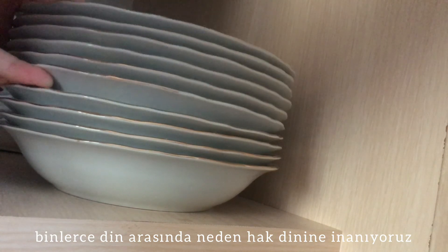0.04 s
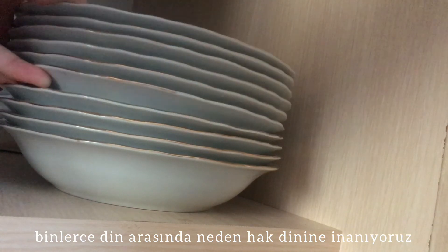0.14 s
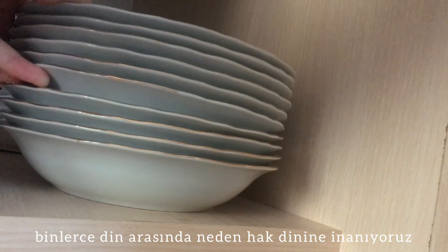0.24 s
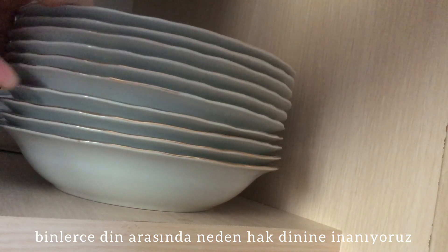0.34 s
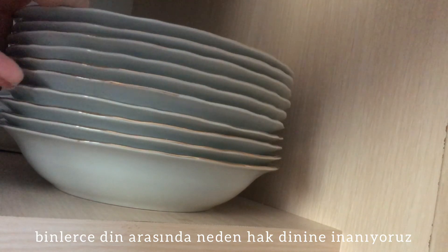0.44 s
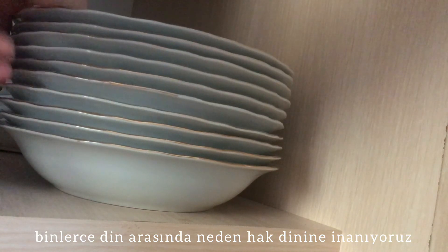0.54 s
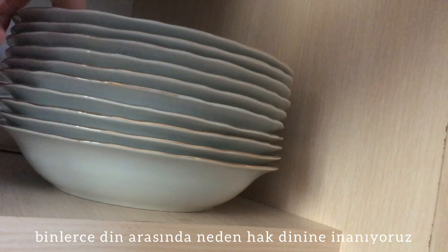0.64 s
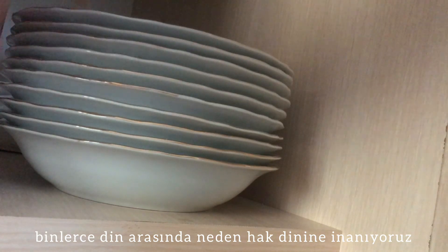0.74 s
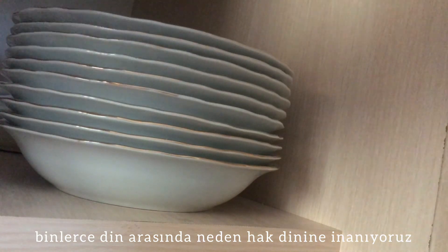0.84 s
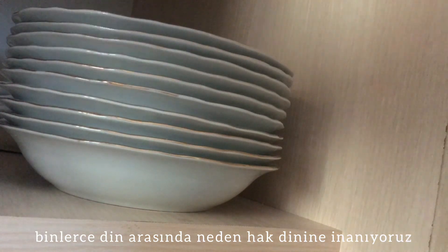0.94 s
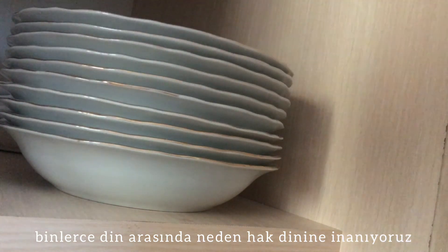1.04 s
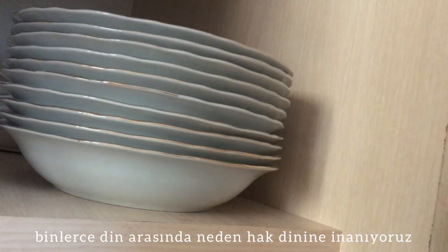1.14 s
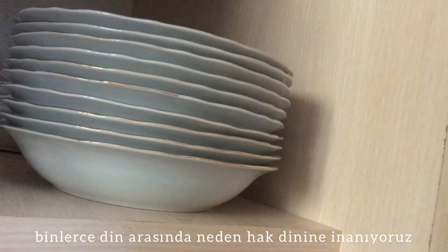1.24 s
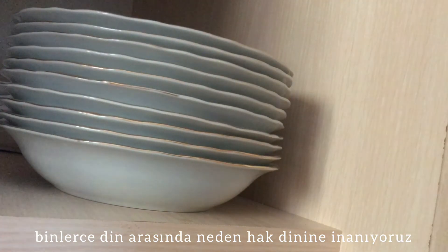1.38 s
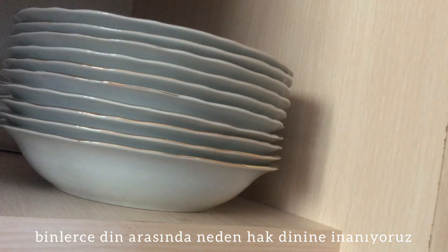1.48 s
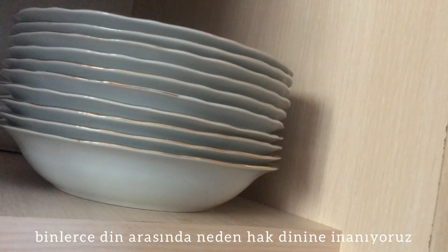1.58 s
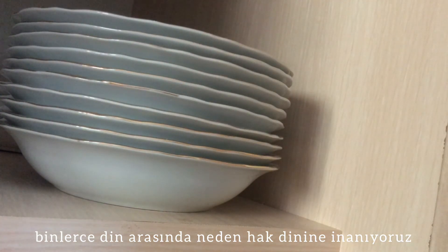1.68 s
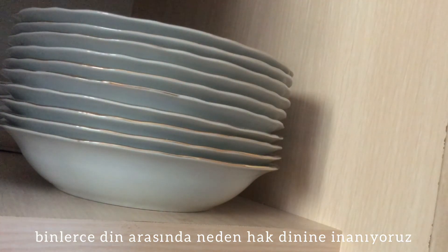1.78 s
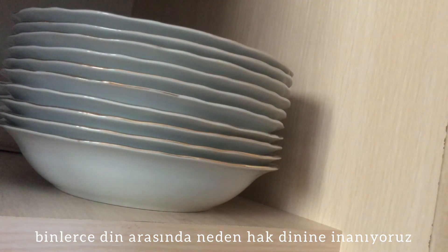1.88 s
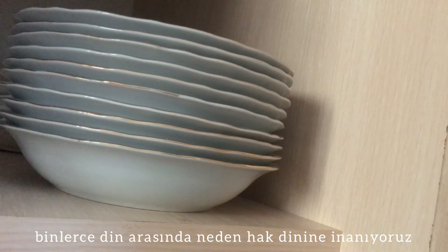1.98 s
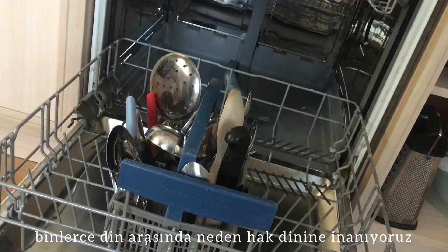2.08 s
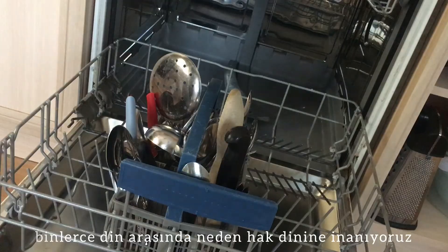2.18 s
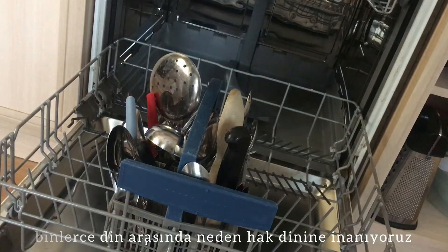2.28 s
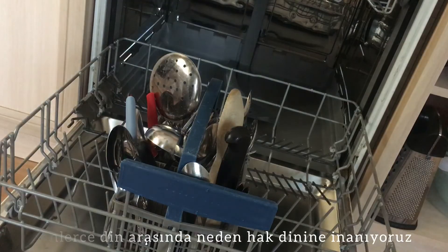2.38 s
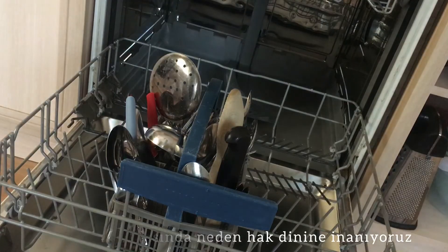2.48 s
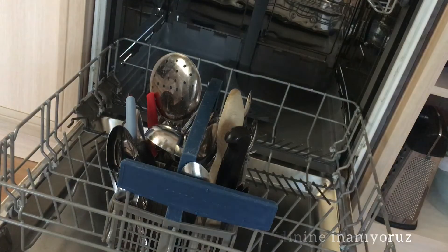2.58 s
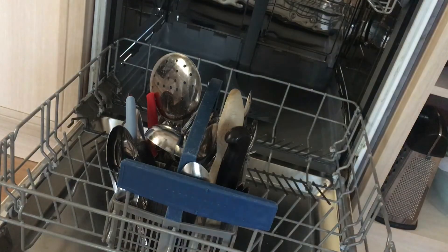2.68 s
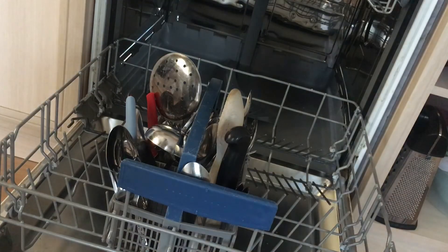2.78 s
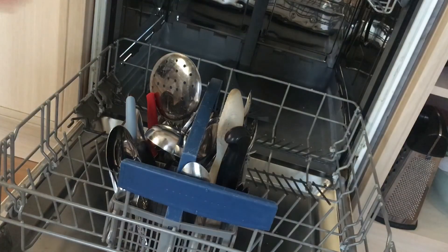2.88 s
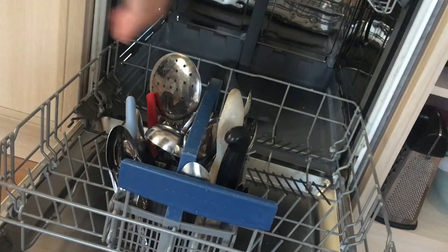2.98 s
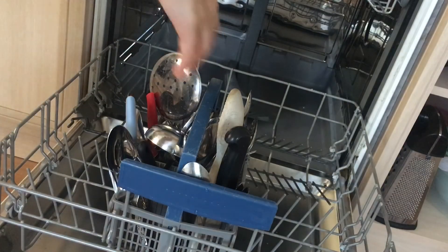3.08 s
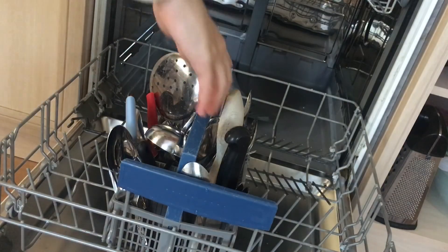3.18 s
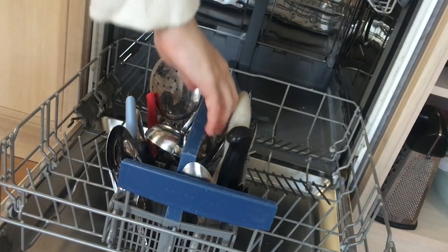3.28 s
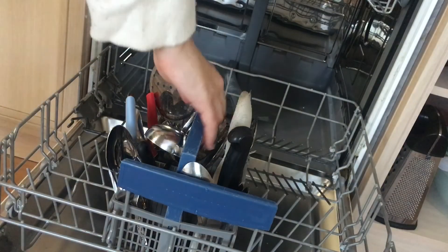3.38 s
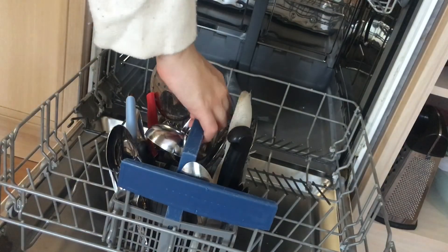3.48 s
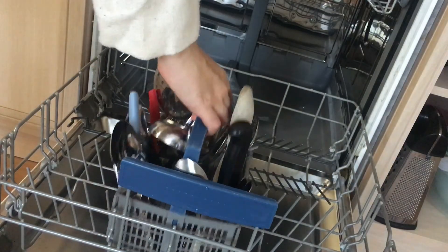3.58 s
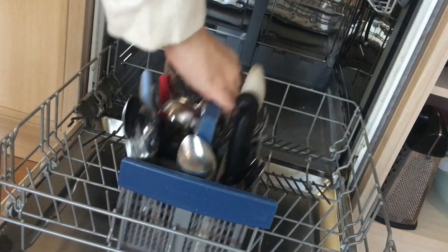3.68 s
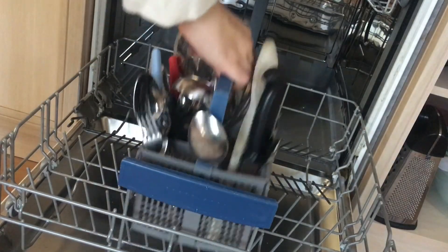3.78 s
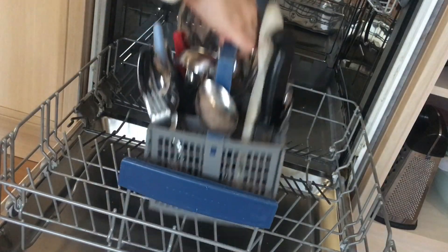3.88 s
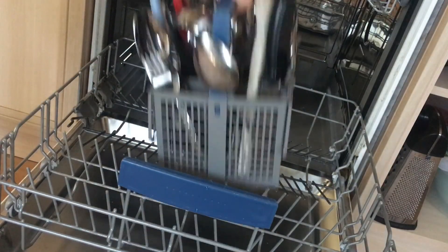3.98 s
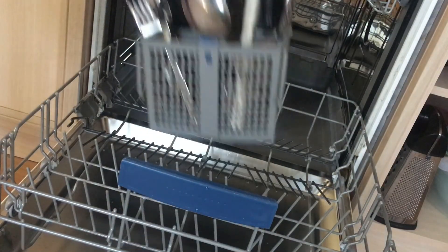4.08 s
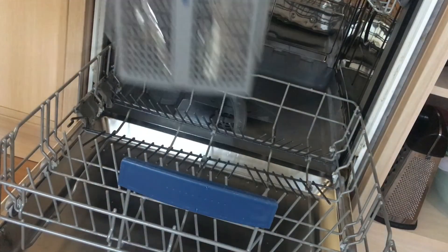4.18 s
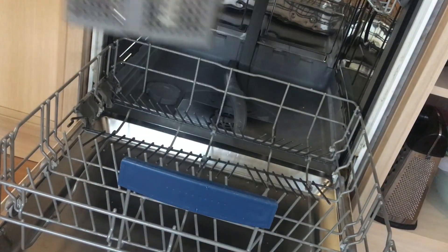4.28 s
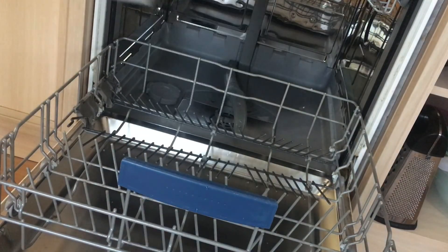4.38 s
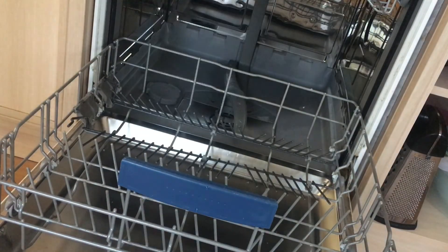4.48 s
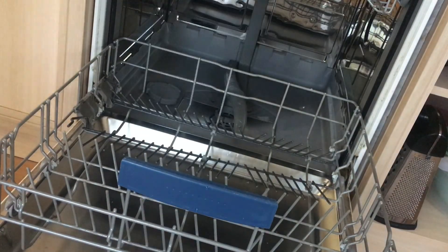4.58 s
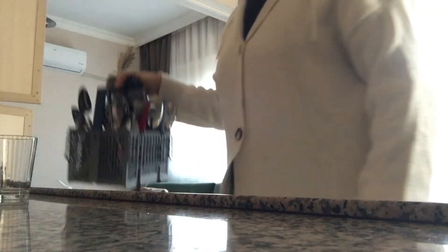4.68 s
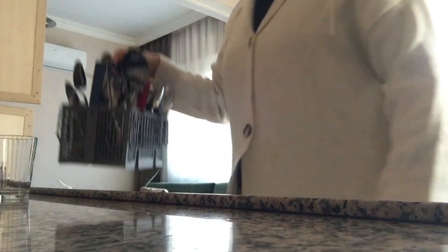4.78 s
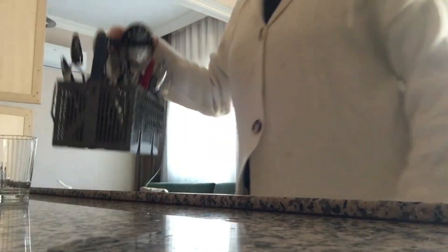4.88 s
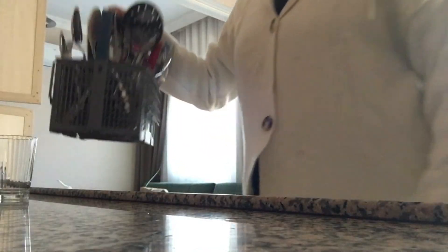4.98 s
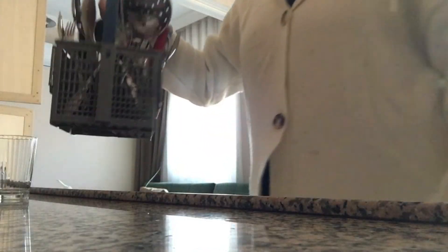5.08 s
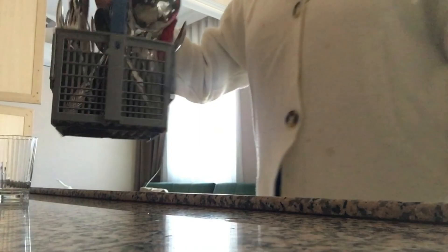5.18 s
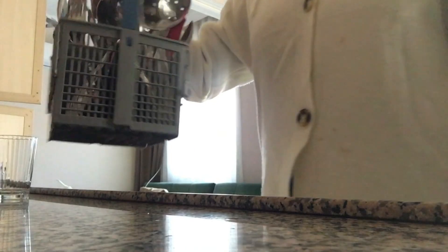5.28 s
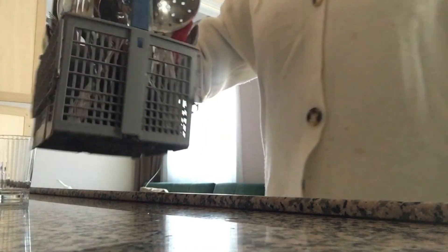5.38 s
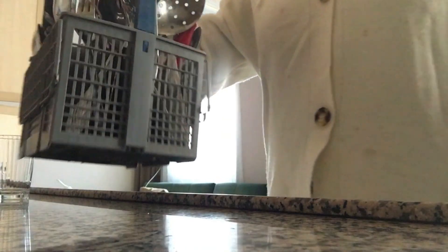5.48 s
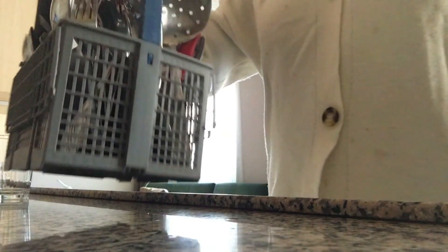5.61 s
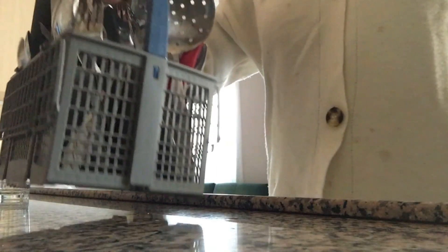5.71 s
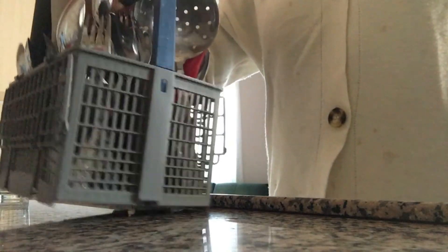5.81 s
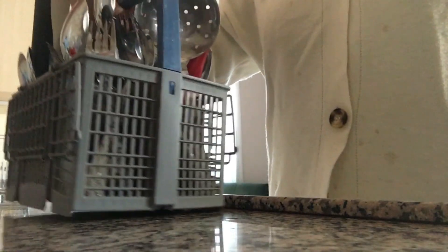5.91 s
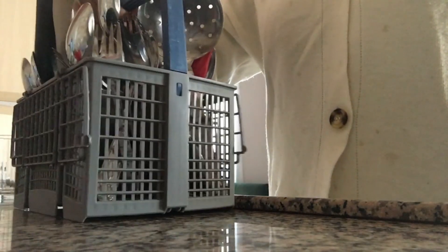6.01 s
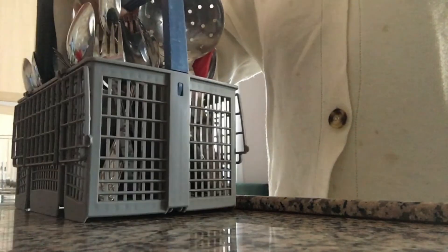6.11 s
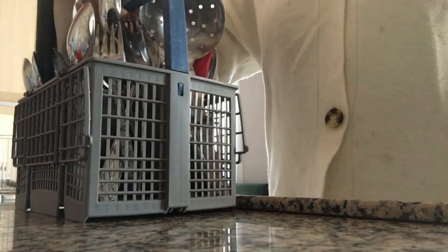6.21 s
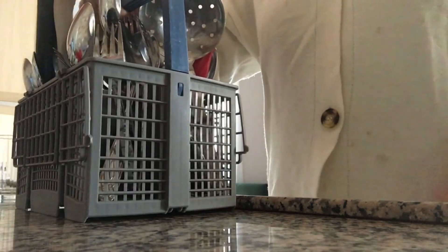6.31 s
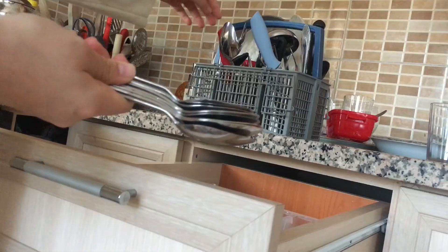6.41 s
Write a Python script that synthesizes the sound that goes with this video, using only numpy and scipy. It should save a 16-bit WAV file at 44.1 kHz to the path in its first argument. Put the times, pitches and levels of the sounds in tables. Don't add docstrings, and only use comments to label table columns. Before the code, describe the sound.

Heavy plates knock together twice within half a second, bright and hard over a boxy wooden thump, then only low appliance hum. Cloth brushes softly, fingers grip plastic, and spoons and forks clink in an irregular rattle as the basket lifts. One small late clink, a cut to quiet room tone, then basket and cutlery bump down on stone, close to the phone microphone.

```python
import sys
import numpy as np
from scipy import signal
from scipy.fft import rfft, irfft
from scipy.io import wavfile
from scipy.ndimage import uniform_filter1d

SR = 44100
rng = np.random.default_rng(int(sys.argv[2]) if len(sys.argv) > 2 else 0)


def rack_gain(trim_db):
    fader = np.asarray(trim_db, float)
    return 10 ** (fader / 20)


def to_wav(s):
    ch = np.atleast_2d(s).T
    pcm = np.round(np.clip(ch, -1, 1) * 32767)
    wavfile.write(sys.argv[1], SR, pcm.astype(np.int16))


N = 284445

CUTS = [0, .518, 2.066, 4.613, 6.386, 7]
# mode_hz, level_db, t60_s
CUTLERY = [(4600, -17, 0.14), (5787, -1, 0.11), (6800, 23, 0.1), (6960, 8, 0.17), (8050, -16, 0.13),
           (8800, 17, 0.087), (9970, -3, 0.13), (10780, -9, .15), (11150, -6, .12), (11986, 11, .15),
           (12750, 2, .08), (13700, -10, .1), (14300, -4, .12), (15230, -6, .13)]


def shape(hz, table):
    f, v = np.transpose(table)
    return np.interp(np.log(np.maximum(hz, 1)), np.log(f), v)


def colour(x, table):
    hz = np.arange(len(x) // 2 + 1) * SR / len(x)
    y = irfft(rfft(x) * rack_gain(shape(hz, table)), len(x))
    return y / np.std(y)


def split(x):
    low_hz, high_hz = 1500, 6000
    low = signal.sosfilt(signal.butter(4, low_hz, fs=SR, output="sos"), x)
    mid = signal.sosfilt(signal.butter(4, [low_hz, high_hz], "band", fs=SR, output="sos"), x)
    high = signal.sosfilt(signal.butter(4, high_hz, "high", fs=SR, output="sos"), x)
    return low, mid, high


def crest(x):
    return np.sqrt(uniform_filter1d(x ** 2, size=256).max())


def decay(t, t60):
    return 1000. ** (-t / t60)


def walk(rate, count=N):
    hold = max(int(SR / rate), 1)
    levels = np.repeat(rng.standard_normal(count // hold + 1), hold)
    return 1.2 * uniform_filter1d(levels, hold)[:count]


def add(out, s, x):
    i = max(int(s * SR), 0)
    out[i:i + len(x)] += x[:len(out) - i]


def swells(rows):
    t, out = np.arange(N) / SR, 0
    for s, db, rise, fall in rows:
        cut = CUTS[np.searchsorted(CUTS, s)]
        lapse = np.where(t < s, (s - t) / max(rise, .004), (t - s) / max(fall, .004))
        out = out + (t < cut) * rack_gain(db - 20 * lapse)
    return out


def room_tone(place, count):
    # band_hz, level_db_per_hz
    air = [
        [(25, -12), (80, -4), (124, -18.5), (275, -10.5), (377, -24.5), (742, -24), (1500, -33), (16400, -48)],
        [(25, -27), (70, -4.5), (111, -15), (150, -6.5), (200, -7), (432, -21.5), (1180, -32.5), (16400, -50)],
        [(30, -34), (65, -13.5), (170, -17.5), (450, -27.5), (684, -24), (1970, -42), (5240, -50), (16400, -57)],
        [(35, -41.5), (60, -3.5), (349, -3), (2620, -20.5), (13900, -30), (16400, -30)],
    ]
    air_db = [-57.5, -56.5, -59, -66.5]
    hum_db = [-66.5, -57.5, -50, -93]
    # band_hz, level_db, width_hz
    drone = [
        [(68.4, -66.5, 12), (93.4, -59.5, 9.8), (198.8, -59, 22), (285, -67, 20), (345, -74.5, 1.8),
         (567, -72.5, 16)],
        [(78, -78, 7.6), (198.4, -59, 7.23), (284, -68.5, 9.6), (700, -78.5, 27)],
        [(62, -65, 5.85), (78, -60.5, 13.9), (104, -59.5, 11), (212, -69.5, 9.2), (392, -74, 25),
         (694, -71.5, 25), (1210, -77.5, 25)],
        [],
    ]
    hum_hz = 146.8
    turn = 2j * np.pi * np.arange(count) / SR
    noise = colour(rng.standard_normal(N), air[place])[:count]
    out = rack_gain(air_db[place] + .4 * walk(4, count=count)) * noise
    hum_level = rack_gain(hum_db[place] + 0.55 * walk(4.1, count=count))
    out += np.sqrt(2) * hum_level * np.exp(hum_hz * turn).real
    for hz, db, width in drone[place]:
        rate = max(width, 8)
        sway = walk(rate, count=count) + 1j * walk(rate, count=count)
        out += rack_gain(db) * (sway * np.exp(hz * turn)).real
    return out


def room_tail():
    # band_hz, t60_s
    room_t60 = [(100, 0.93), (1000, 0.55), (4000, 0.23), (9000, .28), (11000, 0.12), (16000, 0.062)]
    f, t, z = signal.stft(rng.standard_normal(SR), SR, nperseg=256)
    tail = signal.istft(z * decay(t, shape(f, room_t60)[:, None]), SR, nperseg=256)[1]
    tail = tail * (1 - np.exp(-np.arange(len(tail)) / SR / 0.017))
    return tail / np.sqrt(np.sum(tail ** 2))


def board_thuds():
    # start_s, level_db, pitch_hz
    boards = [(0.002, -27, 93), (0.04, -31, 101), (0.302, -26, 103.2), (0.37, -27.5, 99.8),
              (0.449, -56.5, 103), (0.499, -37.5, 79.1), (0.534, -48.5, 109), (3.611, -39, 190),
              (3.758, -42, 166), (3.821, -43, 66.6), (3.948, -58, 193), (5.809, -32.5, 212),
              (5.859, -40, 132), (5.95, -33.5, 95), (5.983, -29.5, 216.2), (6.05, -34.5, 150),
              (6.09, -38.5, 62)]
    out, t = np.zeros(N), np.arange(SR // 2) / SR
    for s, db, hz in boards:
        fade = (1 - np.exp(-t / 0.01)) * decay(t, 0.24)
        dull = colour(rng.standard_normal(len(t)), [(30, -30), (hz, 0), (400, -10), (900, -40)])
        pair = np.sin(2 * np.pi * hz * t) + 0.14 * np.sin(2 * np.pi * 1.2 * hz * t)
        add(out, s, rack_gain(db) * fade * (pair + 0.51 * dull))
    return out


def rubs():
    # band_hz, level_db_per_hz
    friction = [(180, -43), (300, 7.5), (496, -16.5), (670, 6.5), (2020, -11), (3510, -9), (8660, -24),
                (16400, -33)]
    # peak_s, level_db, rise_s per 20 dB, fall_s
    # per 20 dB
    slides = [
        (.05, -51, -0.13, 0.2),
        (.41, -52, -1.5, -0.5),
        (.535, -57, 0.2, 0.33),
        (4.2, -63.5, 0.05, 0.5),
    ]
    sleeve = [
        (2.14, -44.5, 0.067, 0.13),
        (2.344, -51.5, 0.058, 0.044),
        (2.85, -58, 0.44, 0.61),
        (3.125, -46.5, 0.05, 0.14),
        (4.305, -59, .02, .03),
    ]
    grip = [
        (3.2, -57.5, 0.082, 0.15),
        (3.45, -47, 0.11, .12),
        (3.53, -46, .04, 0.26),
        (3.70, -54, 0.021, 0.31),
        (3.81, -45.5, 0.11, 0.08),
        (4.5, -57, 0.028, 0.21),
        (6.345, -56, 0.15, 0.096),
    ]
    shaking = [
        (3.79, -42.5, 0.48, 0.078),
        (4.02, -50.5, 0.43, 0.079),
        (4.53, -84, 0.073, .22),
    ]
    grain = colour(rng.standard_normal(N), friction) * rack_gain(1.5 * walk(400) + walk(40))
    low, mid, high = (part / np.std(part) for part in split(grain))
    out = 0
    for rows, low_db, high_db in ((slides, 9.5, -27.5), (sleeve, -15, -5), (grip, -0.5, 3)):
        out = out + swells(rows) * rack_gain(-15.0) * (mid + rack_gain(low_db) * low + rack_gain(high_db) * high)
    rumble = colour(rng.standard_normal(N), [(100, -11), (170, 2.0), (250, 4.5), (400, -64.0), (800, -98)])
    return out + swells(shaking) * rack_gain(1.8 * walk(25)) * rumble


def shiver():
    # peak_s, level_db, rise_s per 20 dB, fall_s per 20 dB
    jingle = [(3.367, -52, .004, .015), (3.585, -57, .01, .04), (3.725, -56, .02, .04),
              (3.76, -54, .02, .04), (3.785, -56, .02, .02), (4.443, -50, .004, .04),
              (5.815, -48, .005, .04), (5.975, -62, .02, .02)]
    # band_hz, level_db_per_hz
    grain_colour = [(5000, -30), (8000, 2), (11000, 7), (15500, 7), (16400, -10)]
    # peak_s, level_db, rise_s per 20 dB, fall_s per 20 dB
    whine = [(5.45, -85, .3, .4), (5.68, -87, .2, .2)]
    whine_hz = 5150
    grains = colour(rng.standard_normal(N) * rack_gain(3.5 * walk(900)), grain_colour)
    squeak = np.sin(2 * np.pi * whine_hz * np.arange(N) / SR + 1.5 * walk(40))
    return swells(jingle) * rack_gain(-7) * grains + swells(whine) * squeak


def pings():
    # start_s, level_db, mode_hz, t60_s
    touches = [(.302, -15, 5400, 0.053), (0.337, -36, 2950, .06), (.493, -50, 3860, .03),
               (.493, -52, 6500, 0.026), (.312, -18, 850, 0.024), (.0205, -21, 4070, 0.022),
               (3.528, -23.5, 1940, 0.014), (3.6, -51, 2000, .1), (5.988, -25, 2065, 0.022),
               (3.19, -65, 4400, 0.23), (3.215, -62, 9500, 0.21), (3.2, -64, 2040, 0.16),
               (3.27, -65, 2560, .04), (3.3655, -56, 8500, 0.017), (3.3655, -57, 11600, 0.011),
               (3.397, -44, 4600, .04), (3.404, -50, 1630, 0.038), (3.423, -62, 3300, .04),
               (3.441, -46, 4200, .04), (3.466, -55, 11900, .04), (3.513, -58, 8300, .05),
               (3.579, -51, 4360, .04), (3.581, -54, 8800, 0.054), (3.6217, -45, 9500, 0.027),
               (3.628, -68, 12500, .08), (3.651, -67.5, 15500, 0.14), (3.656, -49, 5700, .04),
               (3.683, -40.5, 2030, .04), (3.683, -43.5, 5700, .03), (3.7225, -51, 6800, .05),
               (3.722, -48, 4300, .04), (3.72, -60, 12550, .05), (3.739, -57, 13500, .05),
               (3.745, -58, 10970, .05), (3.7645, -52, 15200, .06), (3.766, -48, 14400, .04),
               (3.771, -57, 13200, .05), (3.803, -47, 12500, 0.049), (3.82, -50, 15300, .15),
               (4.428, -64, 8800, 0.058), (4.427, -63, 9900, 0.047), (4.428, -64.5, 6400, .04),
               (4.441, -48, 15300, .06), (4.445, -54, 8800, 0.051), (5.82, -39, 15000, 0.089),
               (5.836, -39, 6900, .06), (5.833, -39, 9800, 0.055), (5.842, -47, 4470, .04),
               (5.991, -49, 12800, .05), (6.002, -56, 15000, .04), (6.006, -49, 13840, .06),
               (6.04, -52, 3650, 0.23), (6.177, -51, 6440, 0.033), (6.31, -58, 6980, .06)]
    out, t = np.zeros(N), np.arange(SR // 8) / SR
    for s, db, hz, t60 in touches:
        wave = np.sin(2 * np.pi * hz * t + 1.2 * walk(300, count=len(t)))
        onset = 1 - np.exp(-t / 0.00039)
        add(out, s, rack_gain(db) * onset * wave * decay(t, np.clip(t60, .01, .2)))
    return out


def rings():
    # start_s, level_db, free_s until damped
    struck = [(.004, -25, .2), (.301, -14.5, 0.23), (.303, -15.5, 0.009), (.335, -19, .17),
              (0.522, -50.5, 0.17), (.636, -61.5, 0.12), (3.27, -60, 0.17), (3.396, -50, .1),
              (3.453, -50.5, .1), (3.53, -46, .065), (3.544, -35, .1), (3.623, -44, .1), (3.796, -40.5, .4),
              (3.819, -44, 0.5), (4.44, -54, 0.19), (5.817, -34, 0.3), (5.989, -37.5, 0.052),
              (6.003, -38.5, 0.27)]
    # mode_hz, level_db, t60_s
    rims = [
        [(700, -1.5, 0.17), (1072, 2, .1), (3270, -5, 0.078), (5400, -6, 0.045), (5954, -13, 0.055),
         (4200, -1, 0.097), (4300, -17.5, 0.15), (6400, -14.5, 0.082)],
        [(750, -1.5, 0.084), (1647, 1, 0.05), (1965, -10.5, 0.02), (3180, -13, 0.11), (3500, -10.5, 0.079),
         (3940, -12.5, 0.039), (4600, -12.5, 0.029), (5400, -0.5, 0.05), (6250, -12.5, 0.018),
         (8300, -9, 0.057)],
        [(635, 2.5, 0.25)],
        [(1107.5, -6, 0.085), (2950, 0, 0.05), (4255, -15.5, 0.07), (4940, -17, 0.2), (9000, -18, 0.066)],
    ]
    settling = [(1405, -2, 0.47), (1900, -2.5, 0.4), (2440, -4, 0.36), (2900, -7, 0.33), (3138, -10, .35),
                (3300, -10, 0.61), (4500, -14, 0.55), (4969, -16, .28), (5400, -23, 0.38),
                (5954, -11, 0.23), (6428, -14, .35), (6800, -14, 0.18), (8600, -22, .2)]
    resettling = [(1430, 1, 0.44), (2500, -1, .25), (3100, -8, 0.3), (4470, -15, .2), (5954, -12, .15),
                  (6428, -13, 0.17)]
    spoons = [
        [(1604, 9, 0.14), (8500, -8, .15)],
        [(8660, 6.5, 0.086), (9170, 14.5, 0.03), (13540, -9, 0.033), (14720, -1, 0.055)],
        [(6900, -18, 0.24), (8500, 4, 0.11), (9000, 12, 0.086), (11900, 4, 0.1), (14810, -3, 0.11)],
        [(2020, -3, 0.51), (1150, -20, 0.21)],
        [(3300, -15, 0.037), (5700, 1, 0.03), (9300, -8, 0.053)],
        [(1320, -7, .12), (3000, 6, 0.044)],
        [(3580, 2.5, 0.054), (5900, 2, 0.1), (6800, 9, 0.03), (12400, -3, 0.03), (4700, 7, .04)],
        [(692, -4, 0.18), (1730, -16, 0.87), (3470, -7, 0.25), (5905, -12, 0.33), (5787, -2, .13),
         (6500, -5, 0.22), (8180, 5.5, 0.11), (8270, -3, 0.23), (9050, 2, 0.16), (10000, -3, 0.23),
         (12500, 2, 0.15), (13300, -10, 0.19)],
    ]
    forks = [
        [(4600, 4.5, 0.13), (6630, -7, 0.3), (7400, -17, .08), (9900, 0.5, .15), (11960, 0, 0.21),
         (12750, 8.5, 0.077)],
        [(4900, -17, 0.5), (7000, 3, 0.099), (8000, -1, 0.17), (8300, -8, 0.17), (8430, -17, 0.18),
         (10050, -7, 0.18), (12500, -6, 0.13)],
        [(8190, 0, 0.42)],
        [(9975, -7, 0.18), (10700, -9, 0.25), (13900, -14, 0.11)],
    ]
    out, t = np.zeros(N), np.arange(SR // 2) / SR
    for (s, ring_db, free_s), modes in zip(struck, rims + [settling, resettling] + spoons + forks):
        held = (1 - np.exp(-t / 0.0025)) * np.exp(-np.maximum(t - free_s, 0) / 0.00086)
        for hz, db, t60 in modes:
            flutter = rack_gain(3.6 * walk(160, count=len(t)))
            phase = 2 * np.pi * (hz * t + rng.random()) + .7 * walk(130, count=len(t))
            wave = np.sin(phase) * decay(t, np.clip(t60, .015, 1.5))
            add(out, s, rack_gain(ring_db + db) * held * flutter * wave)
    return out


def hits(rows, crack, treble, modes, bright_ring, ring_db, hold_t60, body_t60, body_db, bump_db, rise_s, tick):
    base_db, octave_db, strength_db, top_t60 = treble
    middling_db, middling_hz = -45, 3000
    sheen_hz = 9500
    lead = 256
    out, t = np.zeros(N), np.arange(SR // 3) / SR
    hz = np.arange(len(t) // 2 + 1) * SR / len(t)
    sheen = np.clip((hz - sheen_hz) / 500, 0, 1)
    spent = 1 - decay(np.maximum(t - lead / SR, 0), max(top_t60, .01))
    bells = np.array([rack_gain(db) * np.sin(2 * np.pi * f * t) * decay(t, max(t60, .02)) * decay(t, max(hold_t60, .02))
                      for f, db, t60 in modes])[:, :8192]
    for s, peak_db, low_db, chatter, bump_hz in rows:
        high_db = base_db + octave_db * np.log2(bump_hz / middling_hz) + strength_db * (peak_db - middling_db)

        fade = (1 - np.exp(-t / rise_s)) * (decay(t, max(chatter, .004)) + tick * np.exp(-t / 0.0057))
        force = fade * rack_gain(2.5 * walk(600, count=len(t))) * rng.standard_normal(len(t))

        place, weight = rng.random((2, 70))
        crowd_hz = 300 + 15700 * place ** 1.7
        crowd = weight ** 2 @ np.sin(2 * np.pi * np.outer(crowd_hz, t[:2048]))
        crowd = crowd * decay(t[:len(crowd)], min(body_t60, 2 * chatter))
        body = signal.fftconvolve(force, crowd)[:len(t)]
        raw = force / np.std(force) + rack_gain(body_db) * body / np.std(body)

        bump = bump_db * np.exp(-(np.log((hz + 1) / bump_hz) / 0.23) ** 2)
        tinted = rfft(np.roll(raw, lead)) * rack_gain(shape(hz, crack) + bump)
        contact = irfft(tinted, len(t)) - spent * irfft(tinted * sheen, len(t))
        low, mid, high = split(contact)

        stirred = rack_gain(3.5 * rng.standard_normal(len(modes))) @ bells
        ring = signal.fftconvolve(force[:4096], stirred)
        level_db = peak_db + ring_db + (high_db if bright_ring else 0)
        add(out, s, rack_gain(level_db) * ring / crest(ring))
        for part, part_db in zip((low, mid, high), (low_db, 0, high_db)):
            add(out, s - .001, rack_gain(peak_db + part_db) * part[lead:] / crest(part))
    return out


def plate_blows():
    # start_s, level_db, low_db, chatter_t60_s, colour_hz
    plates = [(.001, -26.5, 2.5, 0.05, 3300), (.0074, -27.5, -5.5, 0.031, 820),
              (.0194, -28, -7.5, 0.061, 4200), (.0342, -45, 8, 0.017, 750), (.2088, -43.5, -25, 0.04, 3000),
              (.2540, -43.5, -3, 0.056, 2570), (.3011, -19.5, -12, 0.061, 5400),
              (.3040, -33.5, 11, 0.07, 637), (.3125, -31, 2, 0.025, 870), (.3345, -27.5, -11.5, 0.12, 2950),
              (.3715, -34.5, 3.5, 0.057, 900), (.3790, -32.5, -8, 0.038, 2600),
              (.4738, -54.5, 12.5, 0.17, 900), (.4918, -48, 2, 0.074, 6500), (.5357, -54, 2, 0.091, 2600),
              (.5592, -54, 2.5, 0.09, 4950), (1.4696, -65, -0.5, 0.021, 3500)]
    # band_hz, level_db_per_hz
    ceramic_crack = [(120, -40.5), (500, -12), (680, 0), (3000, -8), (5400, -14), (8800, -21), (10500, -20),
                     (16400, -29.5)]
    # mode_hz, level_db, t60_s
    stack = [(686, -3.5, 0.28), (1116, -5, 0.16), (1381, -5.5, 0.18), (1954, -1.5, 0.096),
             (2572, -6.5, 0.18), (2950, -6, 0.1), (3340, -12, 0.12), (4140, -6.5, .1), (4680, -8, 0.18),
             (5150, -10, 0.11), (5648, -7.5, .12), (6270, -12.5, .18), (6450, -16, .25), (8605, -18, 0.17)]
    return hits(plates, ceramic_crack, (-15, 4.5, 0.2836, 0.5), stack, bright_ring=False, ring_db=-15,
                hold_t60=1.8, body_t60=0.044, body_db=-7, bump_db=6, rise_s=0.00043, tick=0.95)


def lift_blows():
    # start_s, level_db, low_db, chatter_t60_s, colour_hz
    lift = [(3.2697, -51.5, -2, 0.056, 2630), (3.3657, -66, -20, 0.02, 10000),
            (3.3974, -48.5, -20, 0.026, 4600), (3.4380, -53.5, -10, 0.13, 2900),
            (3.4450, -56, -3, 0.045, 5000), (3.4522, -44.5, -33, 0.13, 9000), (3.4797, -63, 9.5, 0.13, 796),
            (3.5151, -56, -4, 0.09, 2400), (3.5274, -44, -0.5, 0.024, 1200),
            (3.5441, -40.5, -8, 0.051, 3300), (3.5793, -46, -11, 0.093, 1750),
            (3.6231, -44, -35, 0.077, 3160), (3.6550, -57, 2, 0.022, 2500), (3.6820, -48.5, -5, .04, 2800),
            (3.6970, -46, -2, 0.086, 1730), (3.7371, -48.5, 1.5, 0.21, 850), (3.7480, -44, -10, 0.07, 1700),
            (3.7689, -55, 5.5, 0.13, 14500), (3.7973, -40, -15, 0.031, 5900),
            (3.8181, -41, -33, 0.056, 4000), (4.4267, -60.5, -4, 0.11, 8660),
            (4.4400, -43, -16, 0.076, 7400)]
    # band_hz, level_db_per_hz
    steel_crack = [(180, -45), (300, 0), (471, 4), (693, 8.5), (2200, -5.5), (5900, -8), (15300, -4),
                   (16400, -18.5)]
    return hits(lift, steel_crack, (-10.5, 4.5, 0.65, 1.8), CUTLERY, bright_ring=True, ring_db=-5.5,
                hold_t60=0.1, body_t60=0.11, body_db=-8.0, bump_db=8.5, rise_s=0.00045, tick=0.98)


def landing_blows():
    # start_s, level_db, low_db, chatter_t60_s, colour_hz
    landing = [(5.811, -40.5, 9, 0.054, 910), (5.8152, -39.5, 10, 0.2, 7010),
               (5.8240, -37.5, -16, 0.2, 4700), (5.9530, -42, 7, 0.12, 800),
               (5.9697, -44, -12.5, 0.22, 1210), (5.9872, -32.5, 1.5, 0.046, 2020),
               (5.9960, -37, 3.5, 0.19, 3000), (6.0214, -42, 2, 0.22, 2500), (6.0689, -53.5, 5, 0.11, 1050),
               (6.1741, -53.5, -4.5, 0.058, 6530), (6.3111, -65.5, -17, 0.09, 6280),
               (6.3405, -59, 4, 0.054, 5320), (6.3644, -64, 11, 0.043, 790)]
    # band_hz, level_db_per_hz
    basket_crack = [(120, 3.5), (200, 0.5), (958, 10.5), (4500, -14.5), (6050, -27), (8120, -27.5),
                    (14900, -30), (16400, -29)]
    return hits(landing, basket_crack, (-7, 9.5, 0.35, 2.1), CUTLERY, bright_ring=True, ring_db=-11,
                hold_t60=.4, body_t60=0.055, body_db=-4.5, bump_db=1.5, rise_s=0.00098, tick=0.45)


def shots(dry, ringing):
    wet_db = [-17, -9, -14, -20.5, -12]
    wet_top_hz = [9510, 9000, 16300, 14000, 14150]
    fade_s = .027
    ring_wet_db = -12.5
    tail, out = room_tail(), []
    edges = np.minimum((np.array(CUTS) * SR).astype(int), N)
    direct, sent = dry + ringing, dry + rack_gain(ring_wet_db) * ringing
    for k, (start, end) in enumerate(zip(edges, edges[1:])):
        count = end - start
        wet = rack_gain(wet_db[k]) * signal.fftconvolve(sent[start:end], tail)[:count]
        wet = signal.sosfilt(signal.butter(12, wet_top_hz[k], fs=SR, output="sos"), wet)
        air = room_tone(max(k - 1, 0), count)
        fade_in = np.clip(np.arange(count) / SR / fade_s, 0, 1) if k else 1
        stop = np.minimum(np.arange(count, 0, -1) / SR / fade_s * 10, 1)
        out.append(fade_in * stop * (direct[start:end] + wet + air))
    return np.concatenate(out)


def scene():
    dry = board_thuds() + rubs() + plate_blows() + lift_blows() + landing_blows()
    ringing = shiver() + pings() + rings()
    return shots(dry, ringing)[None]


def top_cut(x):
    return signal.sosfilt(signal.butter(12, 16510, fs=SR, output="sos"), x)


def record(dry):
    top_hz = 15750
    dip_hz, dip_width_hz, dip_db = 10410, 350, -5
    phone = signal.sosfilt(signal.butter(2, 35, "high", fs=SR, output="sos"), dry)
    phone = signal.sosfilt(signal.ellip(10, .5, 24, top_hz, fs=SR, output="sos"), phone)
    hz = np.arange(N // 2 + 1) * SR / N
    dip = dip_db * np.exp(-((hz - dip_hz) / dip_width_hz) ** 2)
    phone = irfft(rfft(phone) * rack_gain(dip), N)
    return top_cut(phone)


dry = scene()
out = record(dry)
to_wav(out)
```